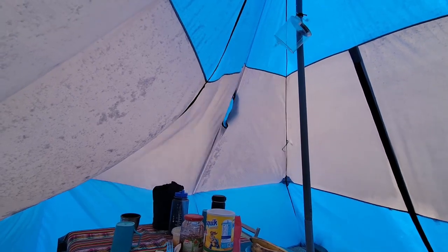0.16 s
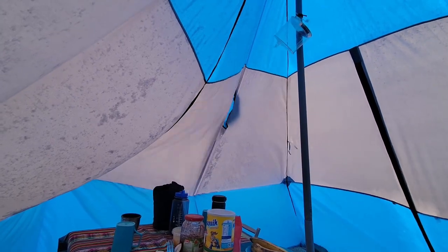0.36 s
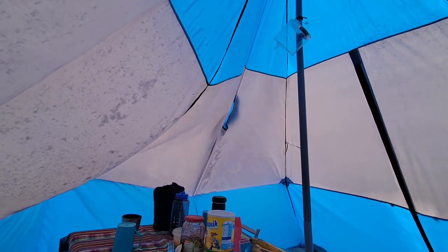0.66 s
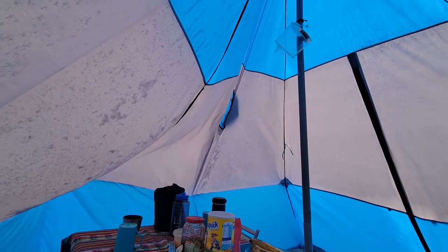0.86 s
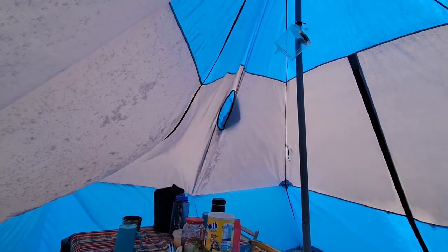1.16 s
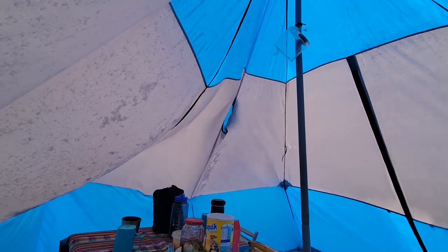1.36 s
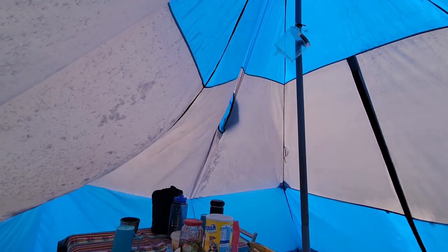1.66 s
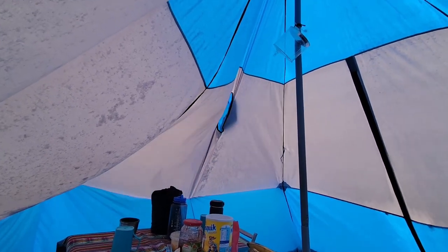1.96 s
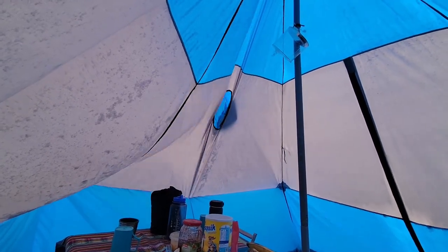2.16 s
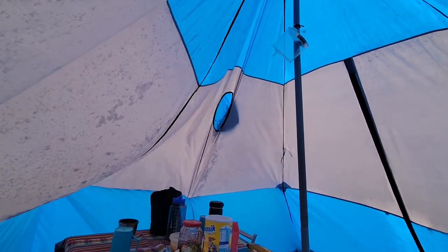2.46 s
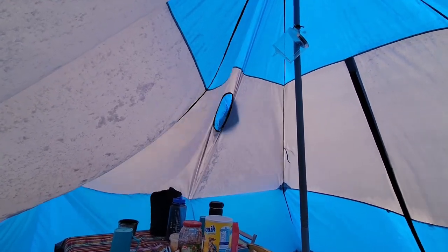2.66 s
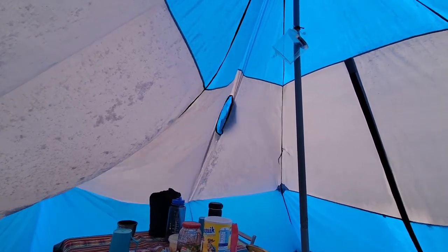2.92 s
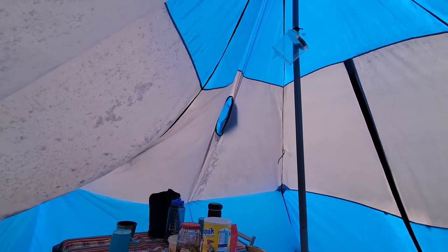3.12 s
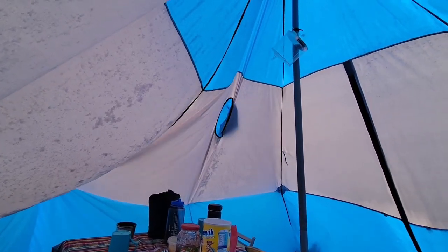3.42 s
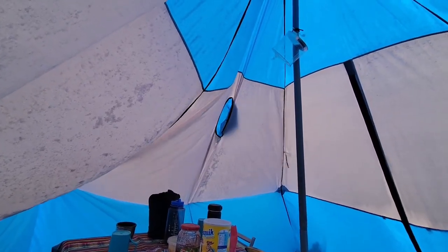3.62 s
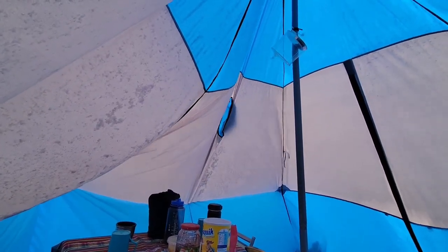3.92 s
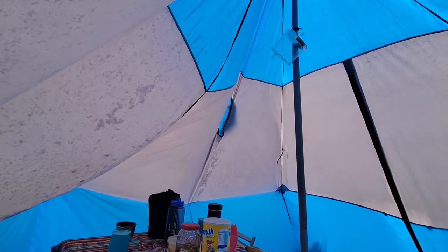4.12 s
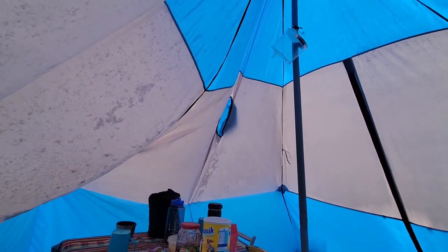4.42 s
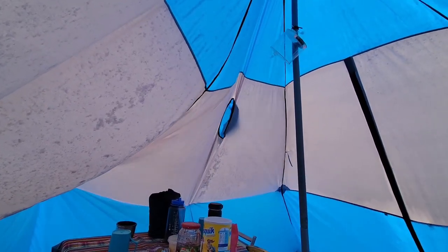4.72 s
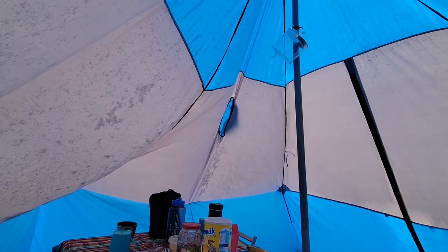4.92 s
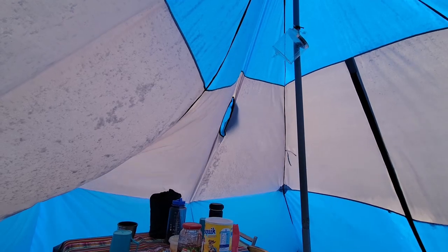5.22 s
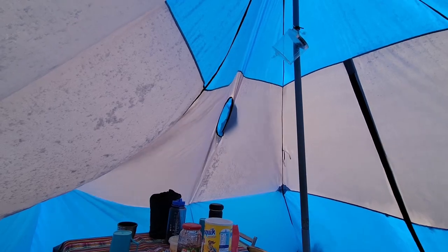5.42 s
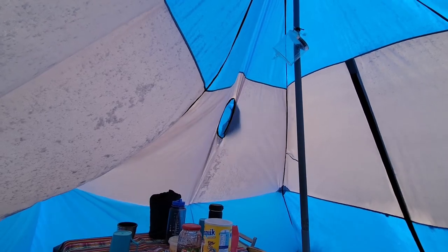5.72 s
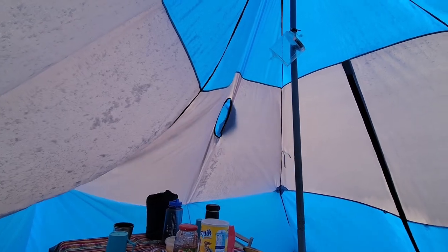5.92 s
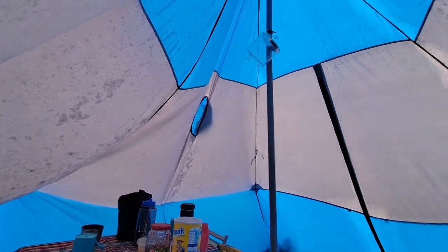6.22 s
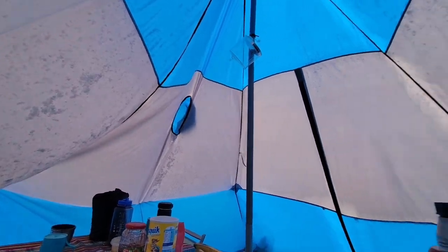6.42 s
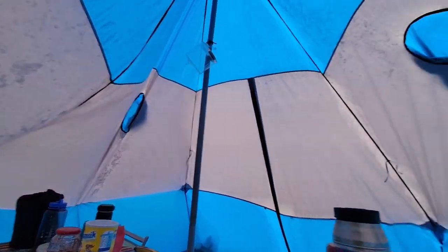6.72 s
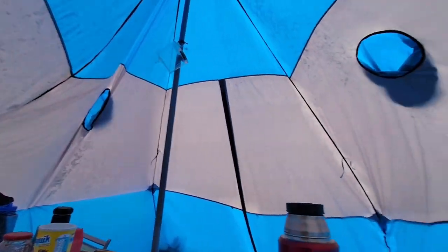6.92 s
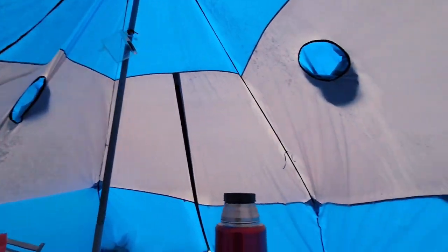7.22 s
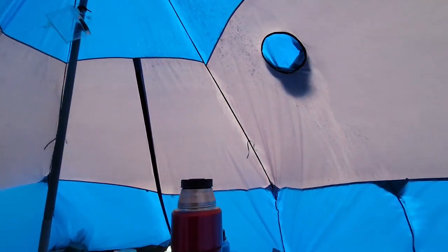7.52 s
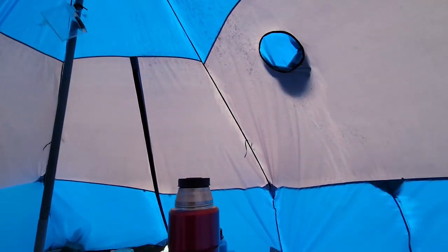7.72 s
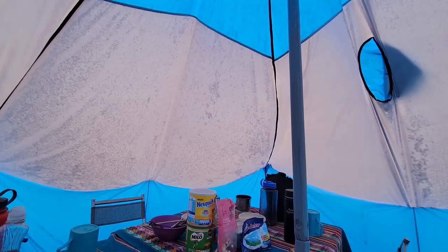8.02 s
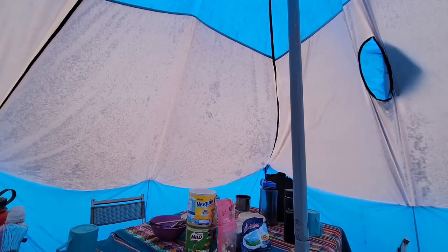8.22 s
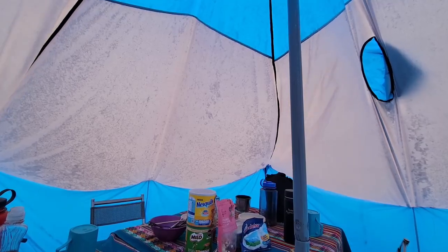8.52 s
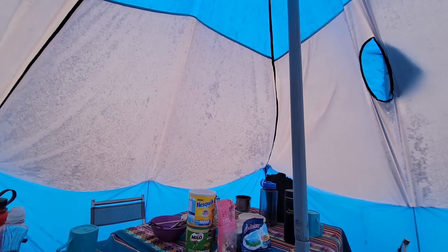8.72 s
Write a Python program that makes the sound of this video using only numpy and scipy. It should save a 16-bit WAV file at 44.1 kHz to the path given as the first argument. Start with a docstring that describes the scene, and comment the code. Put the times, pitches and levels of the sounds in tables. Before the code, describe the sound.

Slack fabric panels whip in irregular gusts around a stereo microphone inside a tent. Dry crackly crumples, hard snaps with short shudders and low, soft thumps cluster early and again near five seconds, often leaning left. Between them the cloth only flutters and pats lightly. Behind everything is a smooth hiss of wind over the outer skin, gradually weakening. The last seconds are subdued, with a minor flap.

```python
"""The walls of a large tent billow, flutter and rattle in a storm wind, heard by a stereo pair inside.
Shaped noise, driven by one curve of wind push, makes the moving cloth; short jerks make the low thumps
of whole walls and the cracks of folds whipping taut, which shudder on through decaying noise.
Sliding folds rustle as swells of dense random crinkles.
Behind it lies the smooth hiss of the wind over the outer skin: high noise at the strength of the wind."""
import sys
import numpy as np
from scipy import signal
from scipy.fft import rfft, irfft, next_fast_len
from scipy.io import wavfile
from scipy.ndimage import uniform_filter1d, map_coordinates

SR = 44100
rng = np.random.default_rng(int(sys.argv[2]) if len(sys.argv) > 2 else 0)


def generate_wav(signal):
    """Clip the signal to [-1, 1] and save it as 16-bit WAV at the path in sys.argv[1]."""
    frames = np.transpose(np.atleast_2d(signal))
    scaled = np.clip(frames, -1, 1) * 32767
    pcm = np.round(scaled).astype(np.int16)
    wavfile.write(sys.argv[1], SR, pcm)


N = 391166

# Wind over the outer skin. Each row: time in seconds, strength in dB.
AIR_STRENGTH = [(0.0, -53.5), (0.27, -54.5), (0.59, -53.5), (1.21, -55.5), (2.12, -58), (2.96, -57.5),
                (3.7, -60), (4.03, -61), (4.67, -60), (4.94, -59), (5.93, -61.5), (6.47, -61),
                (6.72, -62.5), (7.06, -61.5), (7.71, -58.5), (8.1, -64), (8.87, -63.5)]


def amp(db):
    """Decibels to gain."""
    return 10 ** (np.asarray(db) / 20)


def unit(x):
    """Scale to rms 1."""
    return x / np.sqrt(np.mean(x ** 2) + 1e-20)


def along(points, hz):
    """Read (Hz, value) points on a log frequency axis."""
    f, v = np.transpose(points)
    return np.interp(np.log(hz + 1), np.log(f + 1), v)


def curve(rows):
    """Join (s, dB) rows by straight lines, one value per sample."""
    s, db = np.transpose(rows)
    return np.interp(np.arange(N) / SR, s, db)


def swing_of(rows):
    """A (s, dB) curve per sample, about its average."""
    db = curve(rows)
    return db - db.mean()


def wobble(rate):
    """A smooth random curve, rate knots a second."""
    knots = rng.standard_normal(int(N * rate / SR) + 4)
    return map_coordinates(knots, [np.arange(N) * rate / SR])


def filtered(x, response):
    """Multiply the spectrum of x by a response of frequency."""
    n = x.shape[-1]
    m = next_fast_len(n + 8192)
    return irfft(rfft(x, m) * response(np.fft.rfftfreq(m, 1 / SR)), m)[..., :n]


def add(track, s, sound):
    """Mix a stereo sound into the track from time s."""
    start = max(round(s * SR), 0)
    room = track[:, start:start + sound.shape[-1]]
    room += sound[:, :room.shape[-1]]


def panned(pan_db):
    """Left and right gains that differ by pan_db."""
    return amp([[pan_db / 2], [-pan_db / 2]])


def surround(pair, spectrum, tilt_db=0):
    """Colour two unrelated signals and spread them as sound from all the walls; rms 1."""
    # Likeness of the two microphones. Each row: frequency in Hz, left-right correlation.
    likeness = [(60, 0.84), (140, 1), (290, 0.62), (640, -0.31), (1300, -0.45), (2400, -0.078),
                (7000, -0.037)]
    # Balance of the two microphones. Each row: frequency in Hz, left minus right in dB.
    balance = [(60, 1.5), (150, 0.5), (380, 3.5), (700, -1), (1300, 1.5), (2400, 2.5), (4400, 6), (8000, 0),
               (15000, 0.5)]
    # The tent's hollow ring. Each row: centre in Hz, width in Hz, lift in dB.
    hollows = [(368, 45, 2.5), (514, 20, 3.5), (840, 100, 1), (1350, 41, 1.5), (1775, 94, 2.5),
               (1984, 32, 4), (2160, 32, 2.5), (2310, 40, 3.5), (2670, 71, 2), (2880, 55, -0.5),
               (3470, 41, 2)]

    def colour(hz):
        ring_db = sum(db / (1 + (2 * (hz - centre) / width) ** 2) for centre, width, db in hollows)
        slope_db = tilt_db * np.log2(hz / 2000 + 0.033)  # tilt_db is per octave
        return amp(along(spectrum, hz) + ring_db + slope_db)

    def mid_side(hz):
        turn = np.arccos(np.clip(along(likeness, hz), -1, 1)) / 2
        return colour(hz) * [np.cos(turn), np.sin(turn)]

    mid, side = filtered(pair, mid_side)
    left_right = np.array([mid + side, mid - side])
    return unit(filtered(left_right, lambda hz: amp(np.outer([.5, -.5], along(balance, hz)))))


def crinkle(size, rate, spread_db, smooth):
    """Tiny buckles of the cloth, rate a second and of uneven size, over smooth rubbing noise."""
    uneven = amp(spread_db * np.clip(rng.standard_normal(size), -2, 2))
    buckles = (rng.random(size) < rate / SR) * uneven
    rubbing = smooth * rng.standard_normal((2, size))
    return unit(buckles * rng.standard_normal((2, size))) + rubbing


def shifting(pair, depth_db):
    """Folds keep changing shape, so the colour of their noise drifts in patches."""
    z = signal.stft(pair, nperseg=512)[2]
    field = rng.standard_normal(z.shape[1:])
    field = uniform_filter1d(field, size=4, axis=0)  # across frequency
    field = uniform_filter1d(field, size=9, axis=1)  # across time
    return signal.istft(z * amp(depth_db * unit(field)), nperseg=512)[1][:, :N]


def jerk(t, hz, cycles):
    """Pressure of a sheet that is stopped short: a suck and a push, a cycle or so long; peak 1."""
    swing = np.sin(2 * np.pi * hz * t) * np.exp(-(2 * hz * t / cycles) ** 2)
    return swing / np.abs(swing).max()


def flap_times(push_db, crowding, count):
    """Random moments that crowd together where the wind pushes hardest, and the push at each."""
    due = np.cumsum(amp(crowding * push_db))
    at = np.searchsorted(due / due[-1], (np.arange(count) + rng.random(count)) / count)
    return at / SR, push_db[at]


def hiss():
    """Wind over the outer skin: a smooth high hiss that follows the strength of the wind."""
    # Colour of the hiss. Each row: frequency in Hz, gain in dB.
    hiss_colour = [(300, -3), (1500, -2), (4000, 4), (6500, 3), (7800, -1.5), (9000, 1), (10300, -3.5),
                   (11400, 0.5), (12300, 4), (14000, 2), (15800, 1)]
    level_db = curve(AIR_STRENGTH) + 8 + 0.73 * wobble(22)
    return amp(level_db) * surround(rng.standard_normal((2, N)), hiss_colour)


def crumples():
    """A slack fold slides over itself: a swell of dense crinkles that dies away."""
    # Sliding folds. Each row: time of the crest in seconds, level in dB ahead of a common 6.5 dB lift,
    # rise in seconds, brightness in dB per octave.
    slides = [(.135, -39, 0.03, -3), (.32, -37, 0.024, -3), (0.456, -28.5, .004, -5.5),
              (.542, -25, 0.014, -4.5), (.623, -37.5, 0.016, 4), (.856, -39.5, 0.017, 0.5),
              (1.461, -39, 0.02, -3.5), (1.719, -45.5, 0.019, -1.5), (2.229, -44.5, 0.04, -2.5),
              (2.572, -49, 0.12, -1), (2.89, -43.5, 0.052, -0.5), (3.015, -45, 0.032, -4.5),
              (3.508, -51.5, 0.021, 2), (4.24, -43, 0.017, -6), (4.597, -32.5, 0.012, -6.5),
              (4.79, -34, 0.038, -8), (4.924, -39.5, 0.011, -4), (5.096, -40.5, 0.0066, -3),
              (5.4, -41, 0.0092, -2), (6.1, -54.5, 0.016, 4.5), (6.29, -51.5, 0.082, -1.5),
              (7.955, -49, .011, -1), (8.038, -42, .003, -0.5), (8.23, -45, 0.026, -2)]
    # Colour of the sliding folds. Each row: frequency in Hz, gain in dB.
    fold_colour = [(200, -1.5), (450, -1), (1200, 1), (2000, -2.5), (3200, -3.5), (4500, -8.5), (6700, -12),
                   (8500, -21), (15000, -20)]
    lead, t60 = .1, 0.24  # s: start ahead of the crest, decay by 60 dB
    track, t = np.zeros((2, N)), np.arange(SR // 2) / SR - lead
    for s, db, rise, tilt_db in slides:
        swell = np.exp(np.minimum(t, 0) / rise) * amp(-60 * np.maximum(t, 0) / t60)
        folds = surround(crinkle(len(t), rate=1200, spread_db=4, smooth=1.0), fold_colour, tilt_db)
        add(track, s - lead, amp(db + 6.5) * swell * folds)
    return track


def flicks(push_db):
    """Small snaps of loose cloth, thicker and louder in the gusts; rows like those of the big snaps."""
    times, pushes = flap_times(push_db, crowding=0.8, count=72)
    rows = []
    for s, push in zip(times, pushes):
        size, pitch, place = rng.standard_normal(3)
        db = -41.5 + 1.06 * push + 1.5 * size
        hz = 900 * 2 ** (0.67 * pitch)
        pan_db = 7.5 + 2 * place
        rows.append((s, db, hz, 0.55, -4, pan_db))
    return rows


def snaps(push_db, shudder_t60=0.13, lag=0.00033):
    """A fold cracks taut; the jerk runs on through the panel and comes back from the other walls."""
    # Cloth whips taut. Each row: time in seconds, peak of the jerk in dB ahead of panning, pitch in Hz,
    # length in cycles, shudder against the jerk in dB ahead of a 3 dB lift, left minus right in dB.
    big_snaps = [(0.4472, -14, 1150, .6, -7, 1), (.5364, -15, 2970, 1.6, -1, 1),
                 (.5377, -8.5, 1340, 1.1, -3, 11), (0.581, -17, 330, 0.54, 2, 7),
                 (.601, -17.5, 350, 0.33, 1, 13), (.622, -20, 800, 0.44, -5, -6),
                 (.955, -29, 375, 0.89, 0, 2), (1.236, -34, 348, 1.3, -12, 4),
                 (1.449, -35, 447, 2.2, 3, -1), (1.54, -33, 550, 0.5, 2, -2), (2.215, -35, 335, 1.5, 3, 2),
                 (2.847, -31.5, 380, 0.73, 3.5, 4), (2.889, -23.5, 500, 0.59, -0.5, 2),
                 (2.897, -21.5, 1300, 0.41, -7, 6), (3.507, -35, 690, 0.95, -5, 11),
                 (3.767, -30, 1800, .55, -5, 7), (3.783, -14.5, 865, 0.88, -11, 7.5),
                 (3.785, -13.5, 160, .46, -18, 10), (4.577, -29.5, 596, .7, -2, 16),
                 (4.708, -29, 544, 0.74, 8, 14), (4.735, -20, 540, 1.07, 2, 13.5),
                 (4.755, -24, 800, 0.27, -8, 9), (4.79, -20.5, 900, 0.48, -4, 8),
                 (4.82, -22.5, 805, .8, -5, 7), (4.918, -26, 2470, 1.3, -1, 9),
                 (4.919, -8.5, 860, 0.55, -1, 10), (4.921, -10, 406, 1.5, -0.5, -7),
                 (5.007, -29, 750, 0.5, -20, 12), (5.1025, -10, 280, 0.83, -17, 10.5),
                 (5.395, -25.5, 475, 1.64, -2, 3), (7.84, -29, 500, .75, -10, 14),
                 (7.888, -30, 420, 1.1, -10, 15), (8.0361, -29, 710, 1.4, -2, 1),
                 (8.106, -29.5, 258, 1.2, -7, -2), (8.229, -31, 900, .6, -13, -5)]
    # Colour of what the walls send back. Each row: frequency in Hz, gain in dB.
    echo_colour = [(100, 18.5), (400, 0.5), (3000, 3), (8000, 1)]
    lead = .01  # s
    track, t = np.zeros((2, N)), np.arange(SR // 5) / SR
    for s, db, hz, cycles, shudder_db, pan_db in [*flicks(push_db), *big_snaps]:
        # the crack reaches the left microphone first, the right one lag seconds later
        crack = jerk(t - lead - np.array([[0], [lag]]), hz, cycles) * panned(pan_db)
        echoes = surround(crinkle(len(t), rate=980, spread_db=-2.0, smooth=1.0), echo_colour)
        echoes *= amp(-60 * t / shudder_t60) * (1 - np.exp(-t / 0.00053))
        echoes /= np.linalg.norm(echoes) / np.sqrt(2)
        shudder = signal.fftconvolve(jerk(t - lead, hz, cycles)[None], echoes, axes=1)[:, :len(t)]
        add(track, s - lead, amp(db) * (crack + amp(shudder_db + 3.0) * shudder))
    return track


def pats(push_db):
    """Soft small thumps that crowd a little into the gusts; rows like those of the big thumps."""
    times, pushes = flap_times(push_db, crowding=0.15, count=28)
    rows = []
    for s, push in zip(times, pushes):
        size, pitch = rng.standard_normal(2)
        rows.append((s, -40.5 + 0.27 * push + 0.5 * size, 75.5 * np.exp(0.2 * pitch)))
    return rows


def thumps(push_db, sway_hz=74, sway_db=-11, cycles=0.66):
    """A whole wall fills or empties: it pushes the air once, then sways briefly on its tension."""
    # Whole walls. Each row: time in seconds, peak of the jerk in dB ahead of panning, pitch in Hz.
    big_thumps = [(0.398, -21.5, 71), (.431, -21.5, 60), (.479, -23, 65), (.536, -18, 70),
                  (0.583, -17.5, 100), (0.6, -15, 64.6), (0.634, -19.5, 70), (0.802, -25.5, 55),
                  (1.48, -31.5, 65), (1.72, -32, 63.6), (2.851, -21.5, 103), (2.886, -25, 111),
                  (3.016, -31, 101), (3.727, -34, 40), (3.787, -17, 58), (3.924, -31.5, 69),
                  (4.031, -35, 76), (4.579, -25.5, 86), (4.645, -27.5, 65), (4.921, -10.5, 92),
                  (4.948, -17.5, 75.4), (5.104, -18, 95), (5.15, -28, 70), (5.402, -29.5, 82.5),
                  (5.738, -31.5, 67.5), (6.094, -39.5, 80), (6.262, -38.5, 80), (7.101, -39.5, 88.5),
                  (7.96, -30.5, 149), (8.378, -26, 66.6)]
    lead, sway_t60 = .03, .19  # s
    track, t = np.zeros((2, N)), np.arange(SR // 4) / SR - lead
    after = np.maximum(t, 0)
    for s, db, hz in [*pats(push_db), *big_thumps]:
        own_hz = sway_hz * np.exp(0.254 * rng.standard_normal())  # every sway has its own pitch
        sway = amp(sway_db - 60 * after / sway_t60) * np.sin(2 * np.pi * own_hz * after)
        pan_db = 6.5 + 0.14 * db  # the harder the thump, the further to the left
        add(track, s - lead, amp(db) * panned(pan_db) * (jerk(t, hz, cycles) + sway))
    return track


def walls(push_db):
    """Gusts heave the walls; every flap of slack cloth swells flutter and rustle together."""
    # Colours of the cloth: heaving walls, slack flutter, fine rustle, rattle.
    # Each row of each: frequency in Hz, gain in dB.
    billow_colour = [(11, -53), (18, -3), (65, 4.5), (400, -22.5), (520, -74), (880, -120)]
    flutter_colour = [(90, -38), (170, 2), (330, -0.5), (520, -5.5), (700, -4), (1200, -9), (1900, -20.5),
                      (4000, -46.5)]
    rustle_colour = [(500, -17), (1100, -5.5), (1900, -3), (3000, -2), (4500, -8.5), (6500, -11.5),
                     (8500, -15.5), (15000, -24)]
    rattle_colour = [(300, -14), (650, 0), (900, -6.5), (1300, 5.5), (1550, -8), (2600, -11.5), (5000, -44)]
    flap = wobble(42)

    # each level: dB at average push, then growth in dB per dB of push
    billow_db = -46.5 + 0.65 * push_db + 1.2 * wobble(14)
    billow = amp(billow_db) * surround(rng.standard_normal((2, N)), billow_colour)

    loose = shifting(crinkle(N, rate=300, spread_db=5.0, smooth=1.67), depth_db=3.0)
    flutter_db = -48 + 1.02 * push_db + 1.4 * flap + 1.4 * wobble(85)
    flutter = amp(flutter_db) * surround(loose, flutter_colour)

    # the rustle also follows the wind over the outer skin
    fine = shifting(crinkle(N, rate=1300, spread_db=8.5, smooth=2.47), depth_db=2.0)
    rustle_db = -52 + 0.4 * push_db + 0.88 * swing_of(AIR_STRENGTH) + 0.52 * flap
    rustle = amp(rustle_db) * surround(fine, rustle_colour)

    # hard-driven cloth rattles
    ticks = shifting(crinkle(N, rate=400, spread_db=7.5, smooth=1.0), depth_db=4.0)
    rattle_db = -58.5 + push_db + 0.61 * wobble(40)
    rattle = amp(rattle_db) * surround(ticks, rattle_colour)
    return billow + flutter + rustle + rattle


def scene():
    """One push of the wind drives walls, thumps and snaps around the microphones; hiss lies behind."""
    # Push of the wind on the walls. Each row: time in seconds, strength in dB (used about its average).
    gusts = [(0.0, -43.5), (0.15, -42), (0.49, -35), (0.84, -38), (1.14, -46.5), (1.53, -46), (2.05, -52),
             (2.54, -49), (2.86, -43.5), (3.01, -51), (3.21, -54), (3.56, -55), (3.93, -53), (4.25, -54),
             (4.62, -47), (4.79, -39.5), (4.96, -38), (5.11, -47), (5.56, -55.5), (6.6, -58), (7.36, -59),
             (7.58, -56.5), (7.78, -51), (8.08, -50), (8.35, -55), (8.87, -56.5)]
    push_db = swing_of(gusts)
    return hiss() + crumples() + snaps(push_db) + thumps(push_db) + walls(push_db)


def record(dry):
    """The recorder rolls off the deepest rumble below 18 Hz and cuts everything from 15.8 kHz up."""
    return filtered(dry, lambda hz: 1j * hz / (1j * hz + 18) * (hz < 15800))


dry = scene()
out = record(dry)
generate_wav(out)
```